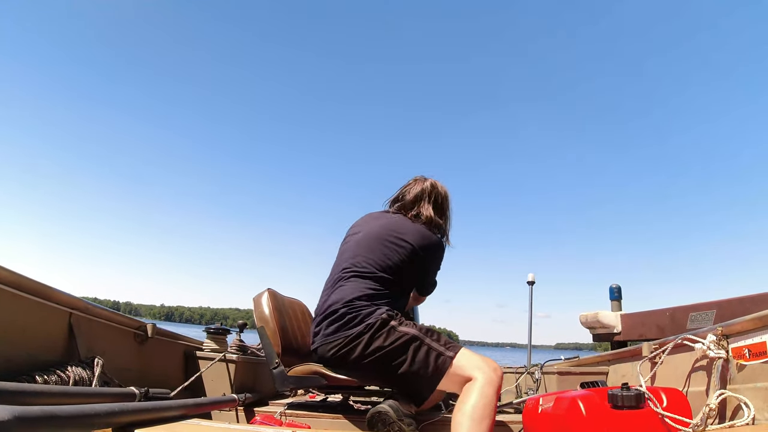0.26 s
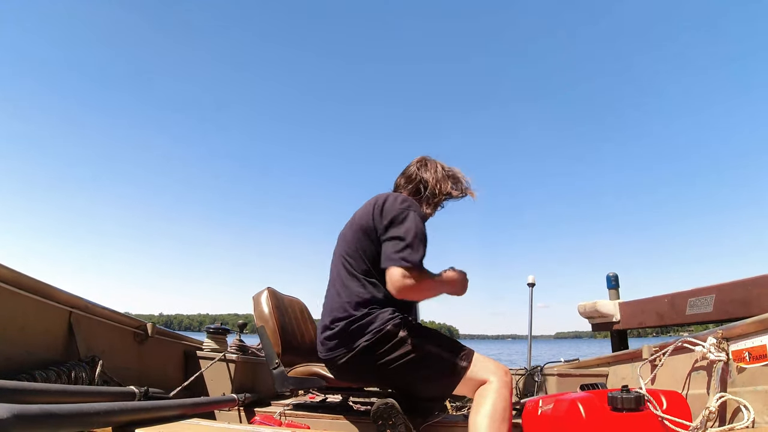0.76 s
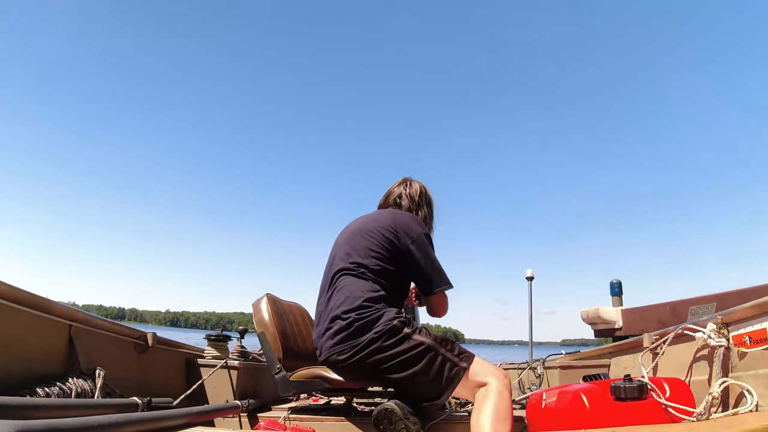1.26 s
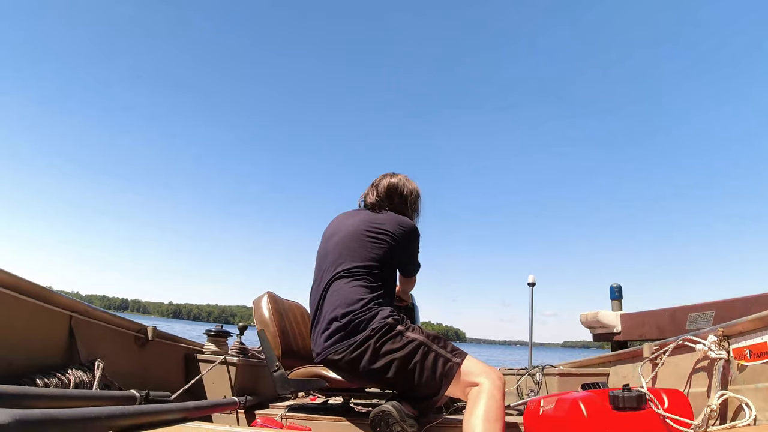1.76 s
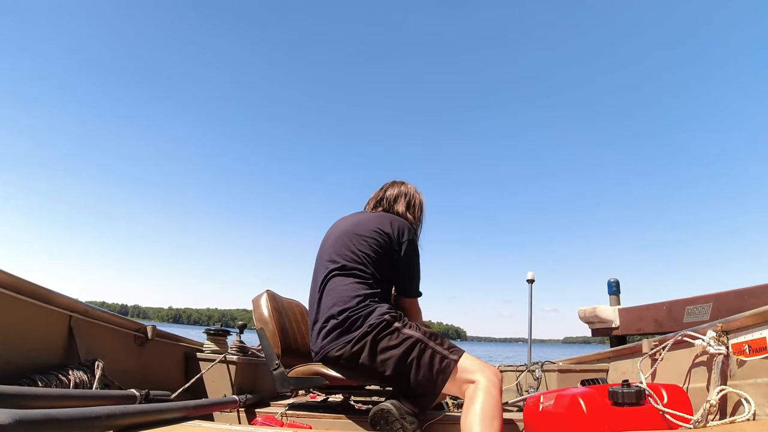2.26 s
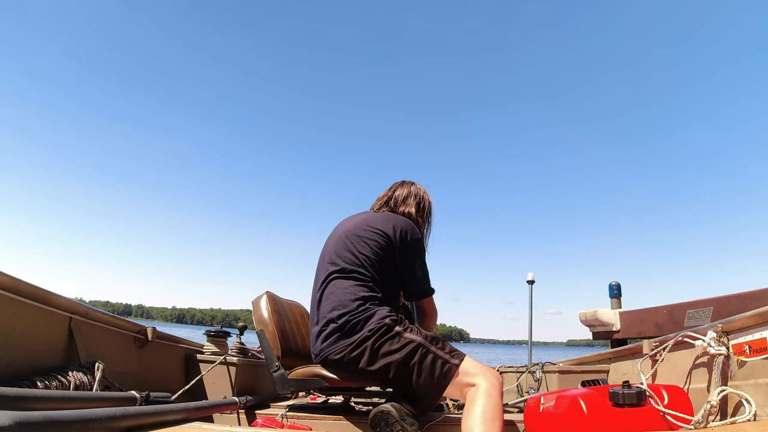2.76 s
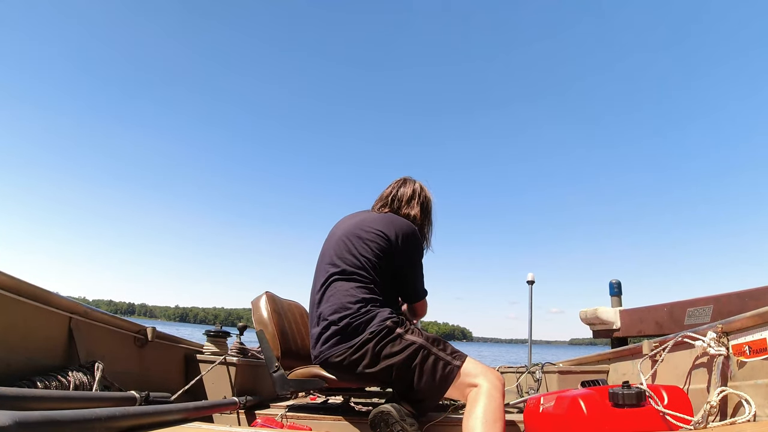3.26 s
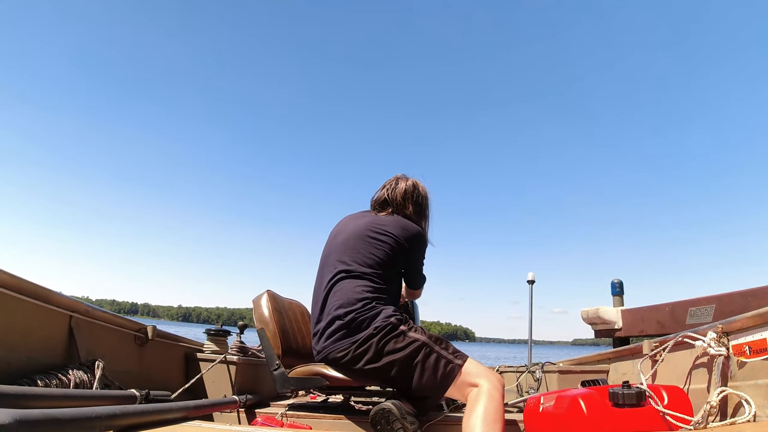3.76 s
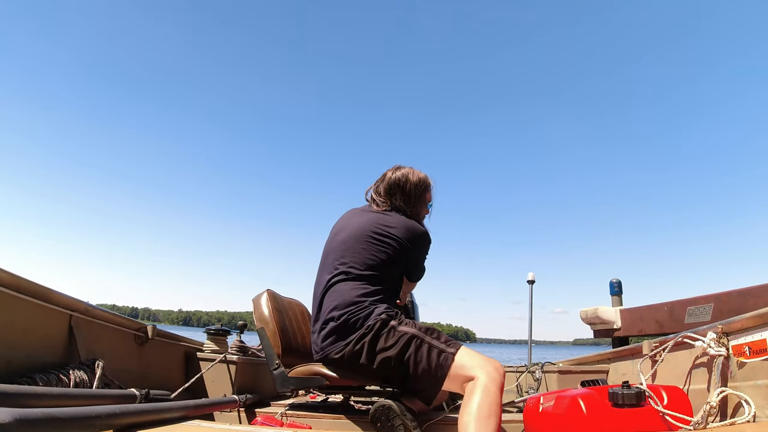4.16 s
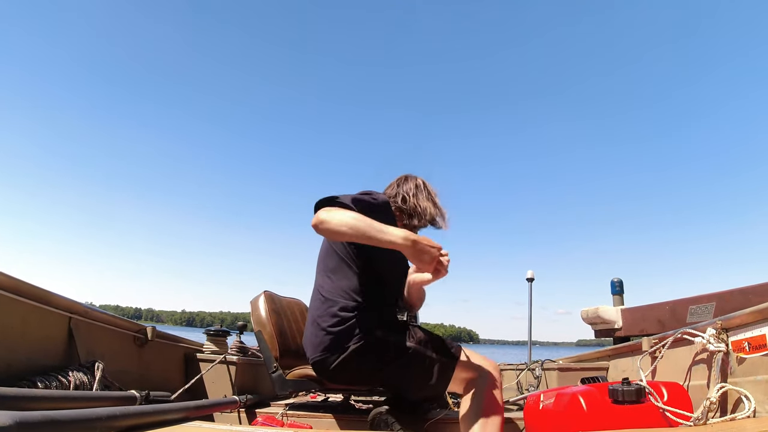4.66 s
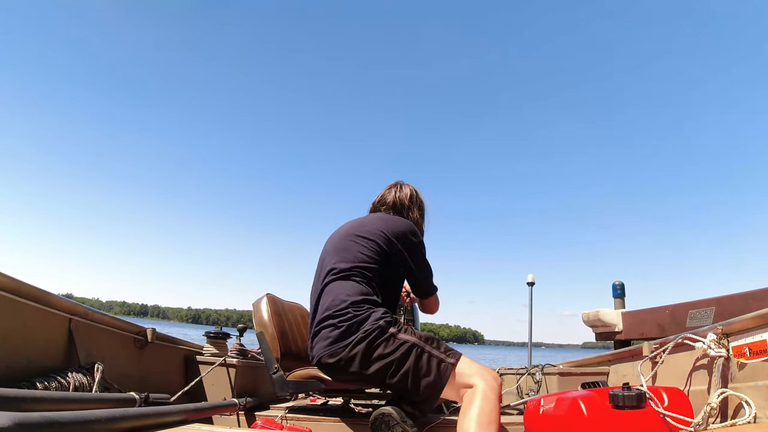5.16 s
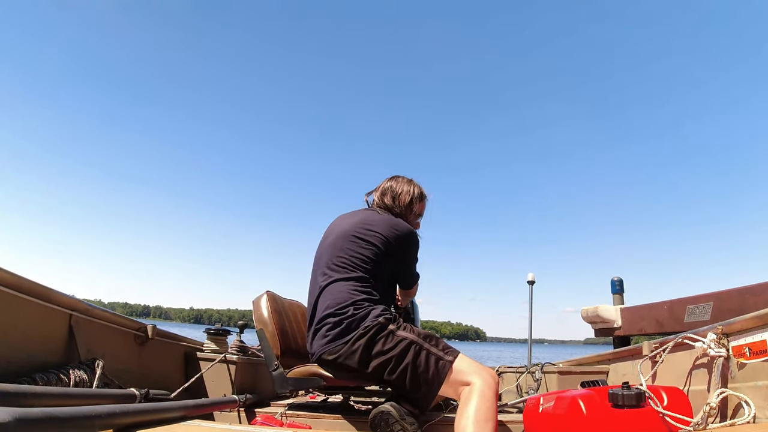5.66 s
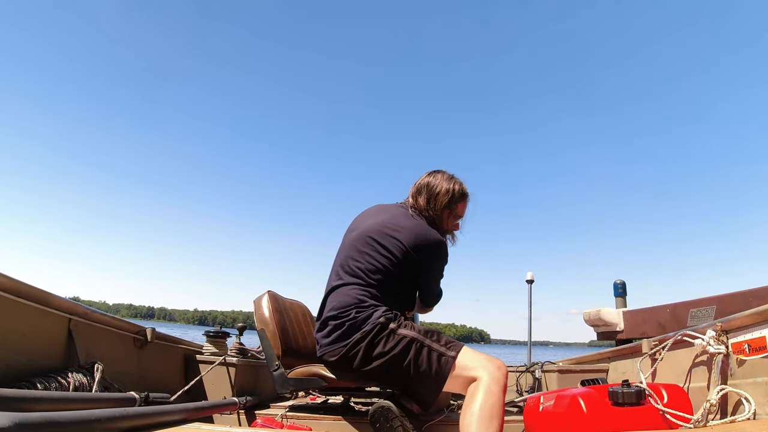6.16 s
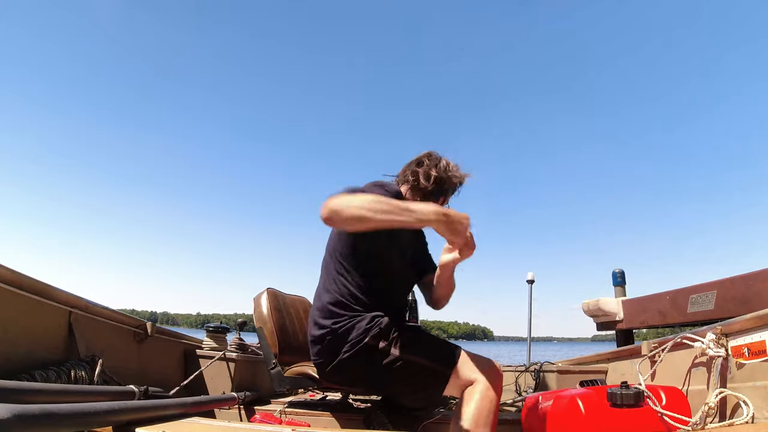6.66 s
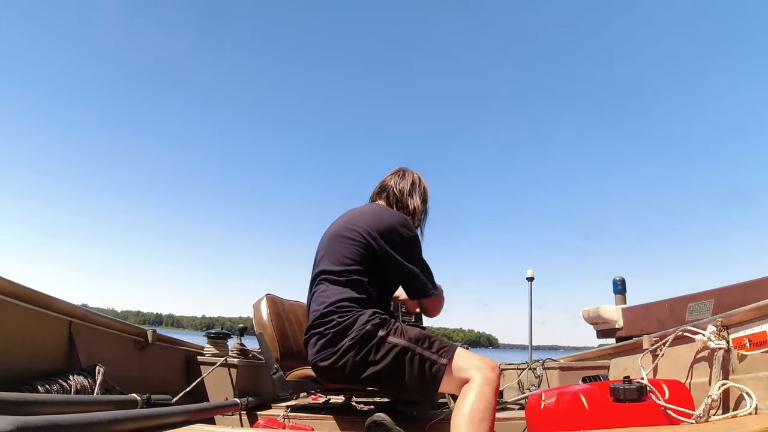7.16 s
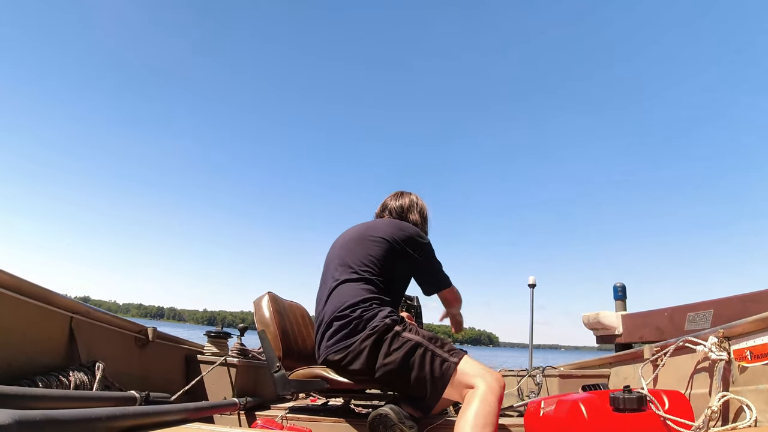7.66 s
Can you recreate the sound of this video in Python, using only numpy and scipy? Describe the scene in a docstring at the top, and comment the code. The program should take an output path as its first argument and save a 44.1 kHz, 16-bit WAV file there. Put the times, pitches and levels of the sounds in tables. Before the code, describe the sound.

Heard from inside a metal boat on calm water, hollow thuds of wavelets and scattered metallic knocks come first. Someone pulls the cord of a small outboard motor twice, each pull whirring, clanking and thumping the hull. On the second the engine fires and runs up loudly, rattling and making the metal plates drum, before its speed and level drop near the end.

```python
"""A small four-stroke outboard on an open metal boat, heard through the hull.
First, wavelets slap the plating and loose gear knocks. At 3.0 s and 5.2 s the starter cord is pulled:
the ratchet whirrs, the starter clanks, the engine chugs and jolts the hull. From 5.5 s the single
cylinder catches with a rising growl; its kicks drum the plates, the intake moans, the valves clatter.
It peaks at 27 firings/s at 6.3 s, then slows towards idle."""
import sys
import numpy as np
from scipy import signal
from scipy.fft import rfft, irfft, next_fast_len
from scipy.io import wavfile
from scipy.ndimage import uniform_filter1d, minimum_filter1d, map_coordinates

SR = 44100
rng = np.random.default_rng(int(sys.argv[2]) if len(sys.argv) > 2 else 0)


def inscribe(sig):
    """Save sig as 16-bit PCM at rate SR to the path in sys.argv[1].

    A 1-D sig is mono; a 2-D sig holds one channel per row.
    Samples are clipped to [-1, 1] before scaling.
    """
    pcm = np.round(np.clip(np.atleast_2d(sig).T, -1, 1) * 32767)
    wavfile.write(sys.argv[1], SR, pcm.astype(np.int16))


N = 348831

# engine speed: t/s, firing rate/Hz
FIRING_RATE = [(5.5, 21.2), (5.66, 22.3), (5.77, 23.4), (5.86, 24.2), (5.95, 25.3), (6.04, 25.2),
               (6.14, 26), (6.3, 26.85), (6.6, 26.7), (6.75, 26.5), (6.94, 25.8), (7.06, 25), (7.14, 24),
               (7.3, 22.1), (7.4, 20.7), (7.52, 19.4), (7.75, 16.9), (7.91, 15.6)]
# engine levels: t/s, load/dB, throb/dB, intake moan/dB, sizzle/dB
ENGINE_LEVELS = [(5.5, -8, -34, -27, -62), (5.69, -2, -26, -56, -78), (5.8, -3, -33, -57, -71.5),
                 (5.89, -3, -31, -36.5, -75), (5.93, 1, -34, -48.5, -78), (6.0, 0, -26.5, -36.5, -73),
                 (6.07, -2, -36, -44.5, -70.5), (6.15, -1.5, -27.5, -37.5, -73.5),
                 (6.27, 0.5, -27, -41.5, -71.5), (6.35, 0, -25.5, -48.5, -72), (6.55, -1, -23, -51, -72.5),
                 (6.88, -3, -25, -58, -80), (7.07, -3.5, -29, -66.5, -93), (7.18, -6, -52.5, -67, -91),
                 (7.38, -10.5, -35.5, -68, -91), (7.52, -13, -29, -67, -92), (7.91, -15.5, -58.5, -56, -98)]
# intake pitch: t/s, f/Hz
MOAN_PITCH = [(5.8, 385), (5.89, 397), (5.94, 442), (6.04, 440), (6.1, 465), (6.2, 478), (6.27, 492),
              (6.5, 485), (7.0, 470)]
# growl on catching: t/s, f/Hz, level/dB
GROWL_SWEEP = [(5.45, 65, -40), (5.48, 78.7, -27), (5.52, 136, -24), (5.57, 196, -24), (5.62, 239, -38),
               (5.68, 238.3, -48), (5.75, 244.2, -36), (5.86, 257, -39), (5.92, 263, -60)]
# engine harmonics: multiples of the firing rate
ORDERS = [4, 6, 12, 14]
# their levels: t/s, level/dB for each order
ORDER_LEVELS = [(5.55, -43, -52, -36, -48), (5.66, -45, -41, -35.5, -43), (5.77, -30, -32, -50, -53),
                (5.86, -30, -45, -56, -47), (5.95, -28.5, -39, -39.5, -43), (6.03, -36, -39, -41, -41),
                (6.12, -28.5, -43, -36, -42), (6.27, -32.5, -36, -56, -49), (6.38, -26.5, -43, -43, -58),
                (6.55, -29.5, -38.5, -43, -51), (6.74, -32, -46.5, -41, -54.5), (6.92, -43, -36, -33, -51),
                (7.04, -47, -41, -45, -63), (7.14, -40.5, -33.5, -33.5, -61.5),
                (7.25, -42.5, -44, -45, -52), (7.31, -47, -41, -39, -42.5), (7.41, -43.5, -47, -59, -36),
                (7.5, -39, -35, -61, -51.5), (7.72, -42, -37, -58, -53.5), (7.91, -55, -45.5, -55, -66)]
# plates singing on the shaft orders: f/Hz, width/Hz, level/dB
SINGING_MODES = [(244.7, 11, 1), (294.7, 35.4, 4)]
# broad plating resonances: f/Hz, width/Hz, level/dB
PLATING_MODES = [(221.6, 72, 1.5), (287, 113, 0.5), (474.5, 55, -2), (573, 115, -3), (773, 65, -5)]
# tappets: f/Hz, width/Hz, level/dB
TAPPET_MODES = [(1311, 41, 9), (1774, 240, -0.5), (2050, 150, 2.5), (2486, 270, -2), (2860, 86, 2.5),
                (3260, 72, 2.5), (3680, 110, -11), (4200, 180, -15.5), (4850, 200, -18)]
# valve seat: f/Hz, width/Hz, level/dB
SEAT_MODES = [(2480, 200, -13), (2860, 95, -5.5), (3590, 330, -7.5), (4960, 230, -24.5)]
# valve seat tick: t/s, level/dB
SEAT_LEVEL = [(5.6, -61.5), (6.3, -55), (6.75, -52), (7.12, -54.5), (7.3, -71.5), (7.5, -83)]
# cowl clatter: f/Hz, level/dB
COWL_SPECTRUM = [(470, -37), (800, 1), (984, -6), (1110, -2.5), (1400, -2.5), (1630, -9), (2050, -11.5),
                 (2190, -7.5), (2450, -7.5), (3590, -12.5), (3990, -19), (4690, -30.5), (6100, -56),
                 (10300, -120)]
# engine sizzle: f/Hz, level/dB
SIZZLE_SPECTRUM = [(4000, -35), (5500, -0.5), (6500, -7.5), (7600, 1), (8300, -5.5), (9600, -8),
                   (10200, -47), (13000, -120)]
# cord pulls: start/s, hardest/s, end/s, start level/dB, hardest level/dB
CORD_PULLS = [(3.013, 3.39, 4.06, -61, -53), (5.2, 5.436, 5.9, -66, -41)]
# ratchet whirr, also water fizz: f/Hz, level/dB
WHIRR_SPECTRUM = [(530, -18), (900, -10.5), (1140, -15.5), (1320, -15), (1600, -17.5), (1880, -19),
                  (2970, -20.5), (4690, -31), (6100, -51.5), (10300, -120)]
# pawl scrapes: t/s, level/dB
PAWL_SCRAPES = [(3.45, -78.5), (5.18, -67.5), (5.37, -69), (5.405, -61), (5.429, -51), (5.546, -57),
                (5.587, -54), (5.62, -71)]
# pawl noise: f/Hz, level/dB
PAWL_SPECTRUM = [(3500, -35), (4800, -6), (6500, -6.5), (8300, -9.5), (9300, -20), (10500, -13),
                 (11700, -22.5), (12500, -42.5), (15000, -120)]
# starter clanks: t/s, level/dB, tilt/dB per cluster
STARTER_CLANKS = [(3.046, -30, 6.5), (3.449, -42.5, 12), (3.708, -40, -23), (3.992, -39, -16),
                  (5.163, -36.5, 5), (5.182, -30, 4.5), (5.354, -30, -3), (5.426, -27, 6.5),
                  (5.582, -51, 20), (5.613, -33, 1)]
# starter mode clusters: f/Hz, level/dB, t60/s, spread/1
STARTER_CLUSTERS = [(910, -1, 0.098, 0.57), (2800, -7.5, 0.071, 0.29), (4620, -30, 0.08, 0)]
# metal knocks and pings from loose gear and the starter: t/s, level/dB, f/Hz, spread/1
METAL_KNOCKS = [(0.004, -43.5, 1246, 0.14), (0.047, -41, 1306, 0.21), (0.05, -56, 2890, 0.03),
                (0.101, -53, 2350, 0.09), (0.375, -57, 2780, 0.45), (0.479, -41, 1580, 0.13),
                (0.5087, -56, 2690, 0.03), (0.671, -45.5, 3200, 0.11), (0.683, -36.5, 1700, 0.46),
                (0.7286, -57, 3900, 0.11), (0.833, -35.5, 995, 0.16), (0.91, -34.5, 793, 0.2),
                (0.92, -34.5, 916, 0.04), (1.251, -51, 3330, 0.26), (1.538, -49.5, 3000, 0.3),
                (1.787, -38.5, 1485, 0.19), (1.819, -37.5, 784, 0.03), (1.938, -37.5, 2134, 0.14),
                (1.945, -50, 1440, 0.02), (2.0957, -58, 2540, 0.13), (2.264, -30, 1296, 0.2),
                (2.832, -49, 4270, 0.09), (2.862, -52.5, 1870, 0.1), (2.919, -32, 820, 0.07),
                (3.131, -29, 825, 0.04), (3.197, -52, 1950, 0.02), (3.344, -46, 2950, 0),
                (3.369, -26.5, 1316, 0.09), (3.5044, -58, 2010, 0.64), (3.5723, -52, 2070, 0),
                (3.66, -43, 676, 0), (3.71, -39.5, 659, 0), (3.734, -39, 1394, 0.06),
                (3.712, -48, 2320, 0.05), (3.644, -39.5, 1160, 0.24), (3.808, -52, 7500, 0.06),
                (3.827, -44, 2170, 0.2), (3.934, -35, 1980, 0.28), (4.042, -55, 3710, 0.07),
                (5.1463, -46.5, 2760, 0.3), (5.367, -33.5, 2420, 0.26), (5.366, -46, 1445, 0.03),
                (5.388, -37, 2820, 0.06), (5.388, -40, 1160, .05), (5.397, -32.5, 980, 0.04),
                (5.427, -31, 1270, 0.09), (5.425, -34, 2880, 0.02), (5.454, -39, 2790, 0.03),
                (5.517, -43, 2250, 0.02), (5.426, -42, 8050, .02), (5.426, -40, 10400, 0.1),
                (5.545, -48, 7300, 0), (5.612, -40, 7630, 0), (3.44, -49, 6500, .05),
                (5.545, -36, 1830, 0.07), (5.548, -43, 4320, 0.07), (5.582, -40.5, 3410, 0.02),
                (5.585, -39.5, 3100, 0), (5.613, -32, 800, 0.22), (6.961, -29.5, 820, 0.22),
                (7.639, -42.5, 2420, 0.15), (7.691, -42, 850, 0.04)]
# hull thuds from water slaps and the pulled engine's chug: t/s, level/dB, f/Hz, t60/s, spread/1
HULL_THUDS = [(0.024, -17, 402, 0.16, 0.2), (0.059, -32.5, 388, 0.18, 0.3), (0.099, -35, 420, 0.21, 0.6),
              (0.465, -36, 267, 0.15, 0.15), (0.507, -26, 199.3, 0.53, 0.21), (0.55, -19, 381, 0.13, 0.05),
              (0.685, -25.5, 350, 0.18, 0.22), (0.692, -22, 199.7, 0.3, 0.21),
              (1.249, -27, 276, 0.22, 0.22), (1.383, -28.5, 258, 0.59, 0.3), (1.468, -39, 223, 0.27, 0),
              (1.543, -38, 256, 0.37, 0.4), (1.826, -38.5, 297, 0.37, 0.24),
              (2.675, -25.5, 342, 0.23, 0.24), (3.056, -23.5, 210, 0.21, 0.2),
              (3.222, -29.5, 333, 0.16, 0.25), (3.262, -29.5, 523, 0.14, 0.07),
              (3.265, -22, 218, 0.18, 0.6), (3.356, -29, 417, 0.11, 0.03), (3.344, -16.5, 237, 0.082, 0.35),
              (3.434, -24.5, 299.3, 0.35, 0.03), (4.107, -25.5, 214, 0.21, 0.26),
              (4.143, -31, 202, 0.44, 0.09), (4.256, -21, 201, 0.37, 0.45), (4.331, -46, 236, 0.17, 0.3),
              (4.436, -27.5, 549, 0.18, 0.17), (4.575, -25, 348, 0.2, 0.21), (4.595, -28, 325, 0.1, 0.28),
              (4.645, -32.5, 344.6, 0.11, 0.22), (5.048, -33, 330, 0.55, 0.42),
              (5.063, -30, 410.4, 0.33, 0), (5.08, -34, 426, 0.24, 0.04), (5.177, -22, 288, 0.2, 0.83),
              (5.36, -27, 269, 0.19, 0.12), (5.455, -20.5, 298.5, 0.41, 0.03), (7.73, -30, 185, 0.17, 0.08),
              (6.489, -18, 218, 0.13, 0.3), (3.052, -23, 490, 0.12, 0.4), (3.51, -39, 434, 0.18, 0.7),
              (4.236, -28.5, 556, 0.21, 0.14), (4.279, -34.5, 690, 0.11, 0.04),
              (5.452, -21.5, 570, 0.19, 0.03), (5.483, -29.5, 534, 0.32, 0.15), (5.506, -26, 468, 0.15, 0)]
# jolts from waves and compression: t/s, boom/dB, sway/dB
HULL_JOLTS = [(0.028, -38.5, -36.5), (0.172, -48, -55.5), (0.506, -27.5, -33.5), (0.691, -28, -60.5),
              (0.737, -27.5, -50), (1.181, -44, -39.5), (1.27, -37, -45), (3.06, -23, -57.5),
              (3.09, -23, -54.5), (3.151, -25, -46), (3.228, -25.5, -24), (3.269, -29, -41),
              (3.31, -25.5, -41), (3.355, -19.5, -25), (3.399, -30.5, -44), (3.474, -21, -36),
              (3.508, -20.5, -33.5), (3.586, -22.5, -38), (3.626, -29.5, -37), (3.69, -43, -42),
              (3.77, -45, -47), (3.97, -35.5, -35.5), (4.098, -48, -37), (4.27, -36, -48),
              (5.202, -32, -35), (5.232, -29.5, -40), (5.28, -41, -44), (5.361, -24.5, -30),
              (5.431, -30.5, -18.5), (5.513, -15.5, -28), (5.62, -17.5, -31), (5.73, -9, -31)]
# bilge space: f/Hz, width/Hz, level/dB
BILGE_MODES = [(128.7, 52.8, -3), (198, 46, -15.5)]
# bilge boom between jolts: t/s, level/dB
BILGE_LEVEL = [(0, -33), (.42, -53.5), (.9, -51.5), (1.6, -49), (2.0, -63.5), (3.0, -73), (3.9, -46),
               (4.4, -44), (4.75, -63), (5.05, -73), (5.2, -38)]
# floor panel: f/Hz, width/Hz, level/dB
FLOOR_MODES = [(87.4, 7.2, 0)]
# floor panel ring: t/s, level/dB
FLOOR_LEVEL = [(0, -47), (.17, -69), (.26, -40.5), (.4, -66), (.51, -37), (.78, -36.5), (.85, -54),
               (1.28, -43), (1.4, -57), (1.63, -43), (1.9, -46.5), (2.19, -40.5), (2.4, -52), (2.64, -53),
               (2.69, -38.5), (2.9, -42.5), (3.01, -48.5), (3.07, -40.5), (3.49, -31), (3.63, -51.5),
               (4.13, -33), (4.24, -48.5), (4.42, -35.5), (4.63, -38.5), (4.73, -62), (4.84, -45),
               (5.02, -51.5), (5.07, -40.5), (5.36, -32.5), (5.75, -34)]
# water wash: f/Hz, level/dB
WASH_SPECTRUM = [(110, -39.5), (190, 2.5), (350, 0), (600, -8), (1030, -11), (1600, -34.5), (3500, -120)]
# background hiss: f/Hz, level/dB
HISS_SPECTRUM = [(800, -34), (1400, -2), (2100, -22.5), (3400, -14), (4800, -15), (5800, -20.5),
                 (7000, -22.5), (9000, -22.5), (13000, -26), (14000, -34), (15500, -46.5)]
# stereo width: f/Hz, side gain/dB
SIDE_GAIN = [(30, -36.5), (200, -24), (500, -18.5), (1000, -11), (2000, -8), (4000, 2.5), (6000, -1),
             (9000, 3), (13000, -1)]

THUMP_DB, DRUM_DB, CLATTER_DB = -30.5, -34, -44  # at 0 dB load
LASH_TURNS, LOOSE_PER_S = 0.035, 160
TEETH_PER_S, RATTLES_PER_S, RUN_DOWN_DB_PER_S = 80, 54, 21.5
KNOCK_T60_S, BOOM_T60_S, SWAY_T60_S, JOLT_RISE_S = 0.16, 0.29, 0.72, 0.027
SWAY_PULL_DB, BOOM_PULL_DB, WASH_PULL_DB = 21, 13.5, 10  # re pull gain
WASH_JOLT_DB = -21.5  # re boom jolt
SWAY_CALM_DB, WASH_CALM_DB, FIZZ_DB, HISS_DB, WHINE_DB = -55.5, -58.5, -72, -78, -91.5
METAL_CUTOFF_HZ, THUD_CUTOFF_HZ, TOP_HZ = 5200, 810, 15500


def engine():
    """Four-stroke single: a throb and a kick every turn, a firing every second turn."""
    firing_hz, = curves(FIRING_RATE)
    load_db, throb_db, moan_db, sizzle_db = curves(ENGINE_LEVELS)
    shaft_hz = 2 * firing_hz
    turns = np.cumsum(shaft_hz) / SR
    turn_index = turns.astype(int)
    kicks = turn_starts(turns) * amp(rng.normal(0, 2, turn_index[-1] + 1))[turn_index]
    throb = amp(throb_db) * np.sin(2 * np.pi * turns) + amp(-40) * np.sin(np.pi * turns + 1.2)
    tonal = np.sqrt(2) * (throb + intake_moan(moan_db) + growl() + harmonics(turns))
    drumming = hull_drumming(kicks, turn_index % 2, shaft_hz, load_db)
    valves = valve_train(turns, shaft_hz, load_db, sizzle_db)
    return (tonal + drumming + valves) * gate(5.5, 9, 0.15)


def hull_drumming(kicks, unfired, shaft_hz, load_db):
    """Kicks, harder on firing turns, and turbulent combustion noise ring the hull and its plates."""
    turbulence = rng.standard_normal((2, N)) * np.sqrt(shaft_hz / SR)
    drive = kicks * (1 - 1.44 * unfired) + 0.67 * turbulence[0]
    low = ringing(drive, [(76.3, 27.4, 0.6), (105.0, 23.4, 1.4)])
    upper = ringing(0.15 * kicks + 0.91 * turbulence[0], [(136.4, 30, 0.4)])
    singing = steady(ringing(kicks * (1 - 0.53 * unfired), SINGING_MODES))
    plating = steady(ringing(0.35 * kicks + turbulence[1], PLATING_MODES))
    thump = amp(THUMP_DB + 0.25 * load_db) * steady(low + upper)
    drum = amp(DRUM_DB + 0.57 * load_db) * steady(singing + 0.75 * plating)
    return thump + drum


def harmonics(turns):
    """Multiples of the firing rate, each wavering in level and phase."""
    tones = np.zeros(N)
    for order, db in zip(ORDERS, curves(ORDER_LEVELS)):
        gain = amp(db - 1 + 2 * wobble(14) + 3 * wobble(45))
        cycles = order * turns / 2 + rng.random() + 0.14 * wobble(22)
        tones += gain * np.sin(2 * np.pi * cycles)
    return tones


def intake_moan(level_db):
    """The intake sounds one unsteady, gliding tone."""
    gain = amp(level_db + 2.5 * wobble(40))
    cycles = np.cumsum(curves(MOAN_PITCH)[0]) / SR + 0.14 * wobble(30)
    return gain * np.sin(2 * np.pi * cycles)


def growl():
    """A tone sweeps up as the cylinder catches."""
    hz, db = curves(GROWL_SWEEP)
    tone = np.sin(2 * np.pi * np.cumsum(hz) / SR)
    return amp(db + 2.9 * wobble(50)) * tone * gate(5.44, 5.93, 0.0142)


def valve_train(turns, shaft_hz, load_db, sizzle_db):
    """Valves strike once a turn, scattered by lash; loose parts rattle in between."""
    lashed = turns + LASH_TURNS * wobble(60)
    since_s = (lashed % 1) / shaft_hz
    force = amp(rng.normal(0, 1.5, int(turns[-1]) + 2))[np.maximum(lashed, 0).astype(int)]
    loose = random_pulses(LOOSE_PER_S, mean_db=0, scatter_db=4, tau_s=0.0025)
    burst = force * decay(since_s, 0.03) * (1 - np.exp(-since_s / 0.001))
    envelope = 0.27 + 0.2 * loose + burst
    strike = force * decay(since_s, 0.0009) * rng.standard_normal(N)
    tappets = ringing(strike + (0.12 + 0.1 * loose) * rng.standard_normal(N), TAPPET_MODES)
    seat = unit(ringing(force * turn_starts(lashed) + 0.12 * strike, SEAT_MODES))
    seat *= amp(curves(SEAT_LEVEL)[0] - 3 * (np.floor(lashed) % 2))
    ping = amp(-76) * steady(ringing(strike, [(4340, 150, 0)]))
    clatter = steady(noise(COWL_SPECTRUM, envelope) + 0.75 * unit(tappets))
    sizzle = steady(noise(SIZZLE_SPECTRUM, envelope))
    return amp(CLATTER_DB + load_db) * clatter + seat + ping + amp(sizzle_db) * sizzle


def cord_pull():
    """Starter gain: grows while the cord is drawn, then runs down."""
    gain = np.zeros(N)
    for on_s, top_s, off_s, on_db, top_db in CORD_PULLS:
        off_db = top_db - RUN_DOWN_DB_PER_S * (off_s - top_s)
        db, = curves([(on_s, on_db), (top_s, top_db), (off_s, off_db)])
        gain += amp(db) * gate(on_s, off_s, 0.013)
    return gain


def ratchet(pull):
    """The starter ratchet whirrs tooth by tooth."""
    teeth = random_pulses(TEETH_PER_S, mean_db=2, scatter_db=3.5, tau_s=0.005)
    return noise(WHIRR_SPECTRUM, 0.95 + teeth) * pull * amp(2 * wobble(30))


def pawls():
    """The pawls scrape in short surges as they bite and slip free."""
    gain = swells(*np.transpose(PAWL_SCRAPES), rise_s=0.012, t60_s=0.32)
    return gain * noise(PAWL_SPECTRUM, amp(2.3 * wobble(80)))


def metal_knocks(pull):
    """Knocks, pings and rattles from loose gear and the starter; the hull answers an octave down."""
    knocks = [(s, db, hz, KNOCK_T60_S / (1 + 2.5 * spread), spread)
              for s, db, hz, spread in METAL_KNOCKS]
    answers = [(s, db - 9.5, hz / 2, KNOCK_T60_S, 0.4)
               for s, db, hz, _ in METAL_KNOCKS if hz < METAL_CUTOFF_HZ]
    clanks = [(s, db + cluster_db + k * tilt_db, hz, t60_s, spread) for s, db, tilt_db in STARTER_CLANKS
              for k, (hz, cluster_db, t60_s, spread) in enumerate(STARTER_CLUSTERS)]
    draws = rng.random((260, 3))
    times_s = np.cumsum(-np.log(1 - draws[:, 0])) / RATTLES_PER_S
    rattles = [(s, 11.5 - 8 * softness, 1000 * 3 ** pitch, 0.06, 0.16)
               for s, (_, softness, pitch) in zip(times_s, draws) if s < 5.8 and pull[round(s * SR)] > 0]
    sound = blows(knocks + answers + clanks, rise_s=0.002) + pull * blows(rattles, rise_s=0.002)
    return lowpass(sound, METAL_CUTOFF_HZ)


def hull_thuds():
    """Low, dull hull thuds: water slaps, and the engine chugging as the cord is pulled."""
    return lowpass(blows(HULL_THUDS, rise_s=0.0011), THUD_CUTOFF_HZ)


def rocking(pull):
    """Waves and the jerked cord drive the hull's low resonances; water washes along with the jolts."""
    times_s, boom_db, sway_db = np.transpose(HULL_JOLTS)
    boom_jolt = swells(times_s, boom_db, JOLT_RISE_S, BOOM_T60_S)
    sway_jolt = swells(times_s, sway_db, JOLT_RISE_S, SWAY_T60_S)
    sway = even(ringing(rng.standard_normal(N), [(32.0, 58, 1.0), (59.0, 29, 5)]))
    sway *= power_sum(amp(SWAY_CALM_DB), sway_jolt, amp(SWAY_PULL_DB) * pull)
    floor = even(even(ringing(rng.standard_normal(N), FLOOR_MODES))) * amp(curves(FLOOR_LEVEL)[0])
    boom = even(even(ringing(rng.standard_normal(N), BILGE_MODES))) * amp(1.3 * wobble(20))
    boom *= power_sum(amp(curves(BILGE_LEVEL)[0]), boom_jolt, amp(BOOM_PULL_DB) * pull)
    wash = noise(WASH_SPECTRUM, amp(3.8 * wobble(21.91)))
    wash *= power_sum(amp(WASH_CALM_DB), amp(WASH_JOLT_DB) * boom_jolt, amp(WASH_PULL_DB) * pull)
    return sway + floor + boom + wash


def fizz():
    """The flickering upper edge of calm water."""
    return amp(FIZZ_DB + 3.6 * wobble(40)) * noise(WHIRR_SPECTRUM)


def far_whine():
    """A faint narrow band at 6 kHz, perhaps insects on the shore."""
    band = unit(ringing(rng.standard_normal(N), [(6010, 300, 0)]))
    return amp(WHINE_DB + 2.5 * wobble(3)) * band * gate(-1, 2.68, 0.15)


def blows(table, rise_s):
    """Each blow rings a dense mode cluster; more spread, less pitch and a softer onset."""
    out, t = np.zeros(N + SR), np.arange(SR // 4) / SR
    bins_hz = np.fft.rfftfreq(len(t), 1 / SR) + 1
    fade = np.minimum(5 * (1 - t / t[-1]), 1)
    for s, db, hz, t60_s, spread in table:
        detune = np.log(bins_hz / hz) / (spread + 0.038)
        bands = np.exp(-(detune / np.array([[0.95], [1.9]])) ** 2)
        core, skirt = irfft(rfft(rng.standard_normal((2, len(t)))) * bands, len(t))
        modes = max(0.7 - 2.2 * spread, 0) * np.sin(2 * np.pi * hz * t)
        modes += min(0.23 + 2.8 * spread, 0.55) * even(even(core))
        modes += 0.49 * amp(-45 * t / t60_s) * unit(skirt)
        fall = decay(t, t60_s) + 0.35 * decay(t, 1.96 * t60_s)  # the hull rattles on
        contact = 1 - np.exp(-t / (rise_s * (1 + (spread / 1.1) ** 2)))
        out[round(s * SR):][:len(t)] += amp(db - 5) * fall * contact ** 2 * modes * fade
    return out[:N] * amp(2.5 * wobble(120))  # chatter of loose parts


def swells(times_s, db, rise_s, t60_s):
    """Gain of events that swell to db at their times and die away."""
    t = np.arange(0, N, 32) / SR
    since_s = np.maximum(t - times_s[:, None] + rise_s, 0)
    shape = np.minimum(since_s / rise_s, 1) ** 2 * decay(np.maximum(since_s - rise_s, 0), t60_s)
    return np.interp(np.arange(N) / SR, t, np.sqrt(amp(db) ** 2 @ shape ** 2))


def random_pulses(per_s, mean_db, scatter_db, tau_s):
    """Randomly timed pulses with exponential tails."""
    hits = (rng.random(N) < per_s / SR) * amp(rng.normal(mean_db, scatter_db, N))
    return signal.lfilter([1], [1, -np.exp(-1 / (tau_s * SR))], hits)


def turn_starts(turns):
    return np.diff(np.floor(turns), prepend=0) > 0


def amp(db):
    return 10 ** (np.asarray(db) / 20)


def decay(t, t60_s):
    return amp(-60 * t / t60_s)


def power_sum(*gains):
    return np.sqrt(sum(g ** 2 for g in gains))


def unit(x):
    return x / np.sqrt(np.mean(x ** 2) + 1e-20)


def steady(x):
    """x at rms 1 over a sliding 0.2 s."""
    return x / np.sqrt(np.abs(uniform_filter1d(x ** 2, SR // 5)) + 1e-20)


def even(x):
    """Flatter envelope, rms 1: a ringing panel or cavity holds its level better than raw noise."""
    return unit(x / np.abs(signal.hilbert(x)) ** 0.18)


def curves(rows):
    """One value per sample for each column after t/s."""
    times_s, *columns = np.transpose(rows)
    return [np.interp(np.arange(N) / SR, times_s, c) for c in columns]


def gate(on_s, off_s, fade_s):
    t = np.arange(N) / SR
    return np.clip(np.minimum(t - on_s, off_s - t) / fade_s, 0, 1)


def wobble(knots_per_s):
    """Smooth random curve."""
    knots = rng.standard_normal(int(N * knots_per_s / SR) + 4)
    return map_coordinates(knots, [np.arange(N) * knots_per_s / SR])


def filtered(x, response):
    size = next_fast_len(N + SR // 2)
    return irfft(rfft(x, size) * response(np.fft.rfftfreq(size, 1 / SR)), size)[..., :N]


def lowpass(x, cutoff_hz):
    return filtered(x, lambda f: 1 / (1 + (f / cutoff_hz) ** 4))


def shaped(x, spectrum):
    """x through (f/Hz, level/dB) points on a log axis."""
    hz, db = np.transpose(spectrum)
    return filtered(x, lambda f: amp(np.interp(np.log(f + 1), np.log(hz + 1), db)))


def ringing(x, modes):
    """x through (f/Hz, width/Hz, level/dB) resonances, each squared for deep valleys."""
    return filtered(x, lambda f: sum(amp(db) * (1j * f * width / (hz * hz - f * f + 1j * f * width)) ** 2
                                     for hz, width, db in modes))


def noise(spectrum, envelope=1):
    """Coloured noise under an envelope, rms 1."""
    return unit(shaped(envelope * rng.standard_normal(N), spectrum))


def scattered_side(mid):
    """The hull carries bass alike to both channels; treble leads on the left, partly scattered."""
    bins = signal.stft(mid, nperseg=512)[2]
    drift = uniform_filter1d(rng.standard_normal(bins.shape), 3, axis=0)
    drift = uniform_filter1d(drift, 5, axis=1)
    scattered = signal.istft(1j * bins * np.exp(1.2j * unit(drift)), nperseg=512)[1][:N]
    return shaped(scattered, SIDE_GAIN)


def scene():
    """Mid/side mix; rocking, ratchet and fizz fade out as the engine catches."""
    pull = cord_pull()
    before_start = (rocking(pull) + ratchet(pull) + fizz()) * gate(-1, 5.91, 0.7)
    mid = before_start + hull_thuds() + metal_knocks(pull) + engine() + pawls()
    side = scattered_side(mid)
    mid += far_whine() + amp(HISS_DB) * noise(HISS_SPECTRUM)
    side += amp(HISS_DB - 2.5) * noise(HISS_SPECTRUM)
    return np.array([mid + side, mid - side])


def record(dry):
    """A limiter ducks the loudest thumps; the band runs from 14 Hz to TOP_HZ."""
    ceiling, window = 0.22, SR // 40
    needed = np.minimum(1, ceiling / (np.abs(dry).max(axis=0) + 1e-9))
    gain = uniform_filter1d(minimum_filter1d(needed, size=window), size=window)
    limited = dry * gain * gate(-1, N / SR, 0.0014)
    return filtered(limited, lambda hz: (hz < TOP_HZ) * hz ** 2 / (hz ** 2 + 14 ** 2))


dry = scene()
out = record(dry)
inscribe(out)
```